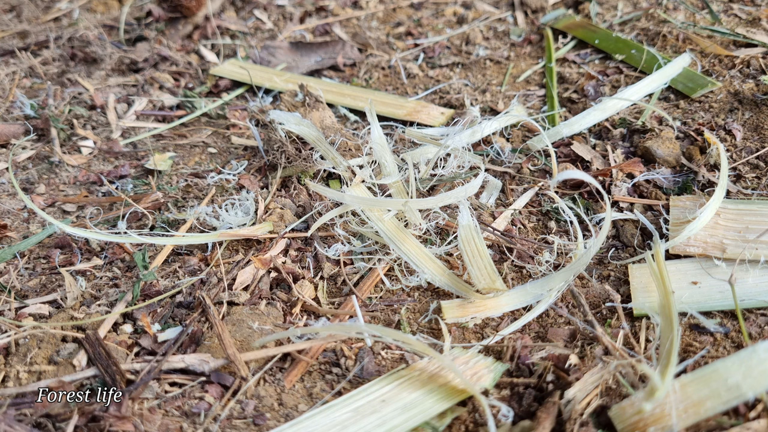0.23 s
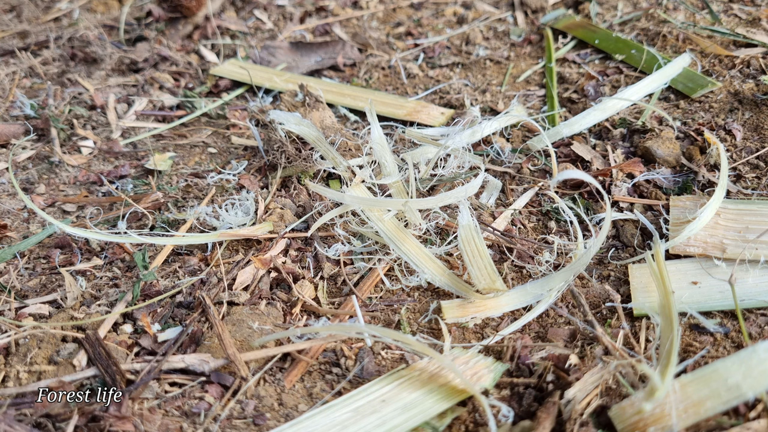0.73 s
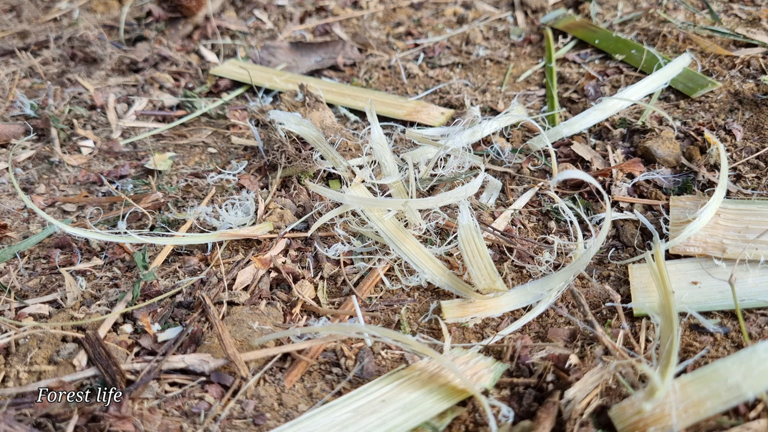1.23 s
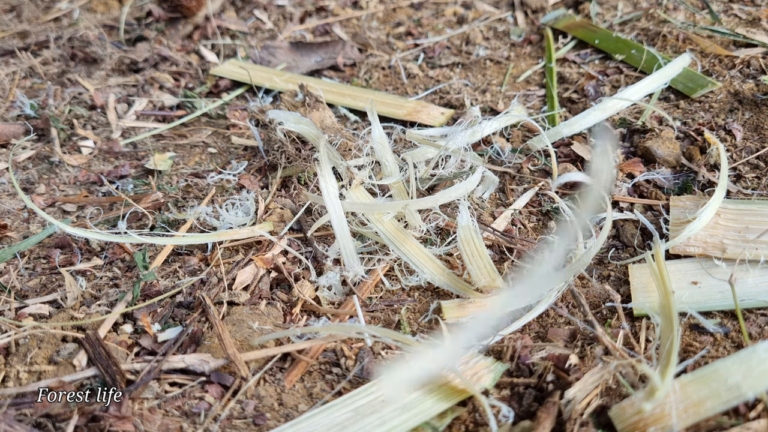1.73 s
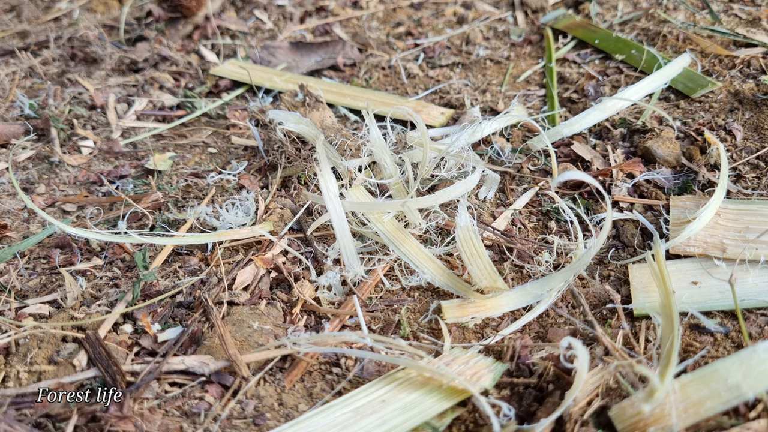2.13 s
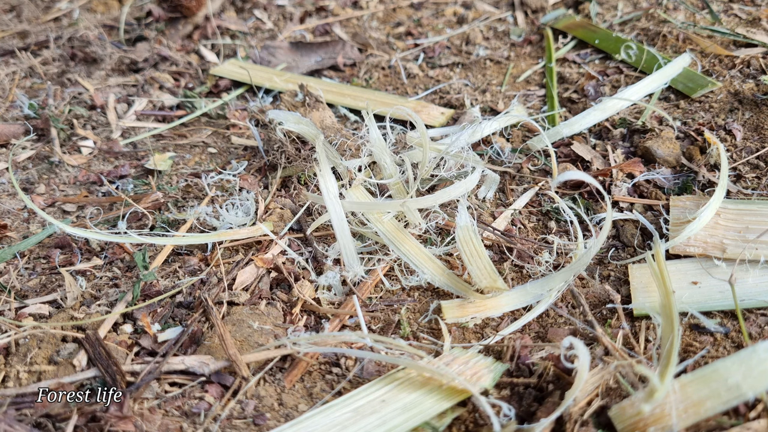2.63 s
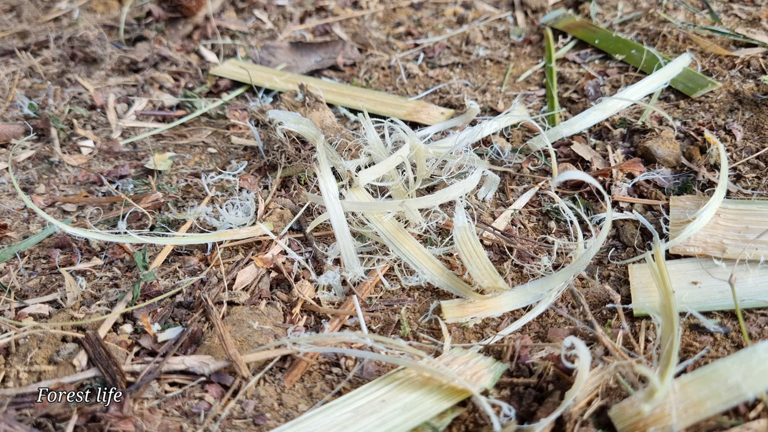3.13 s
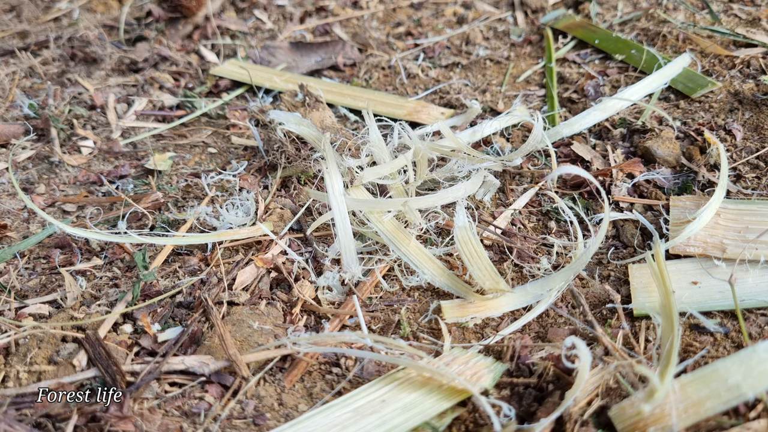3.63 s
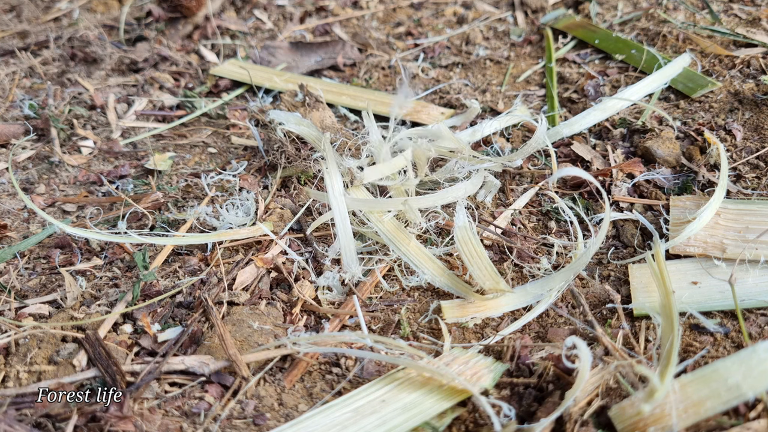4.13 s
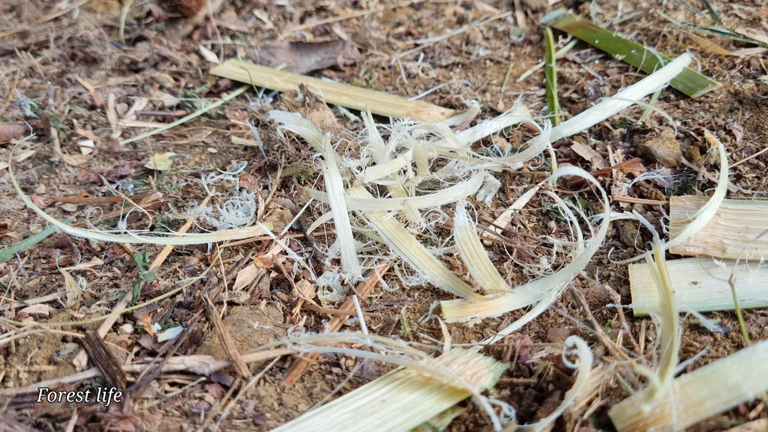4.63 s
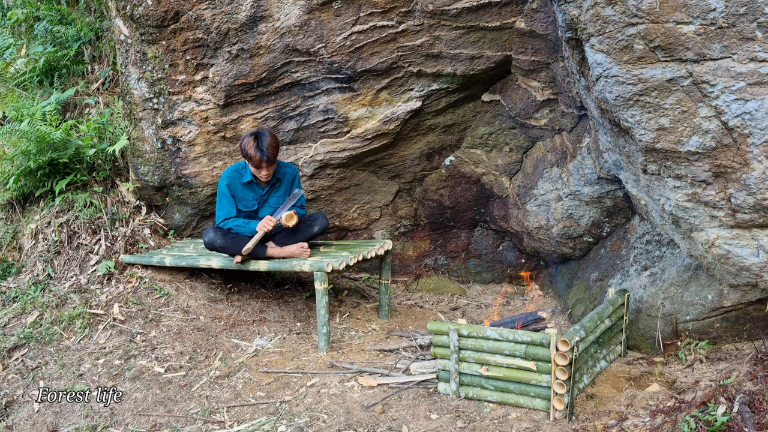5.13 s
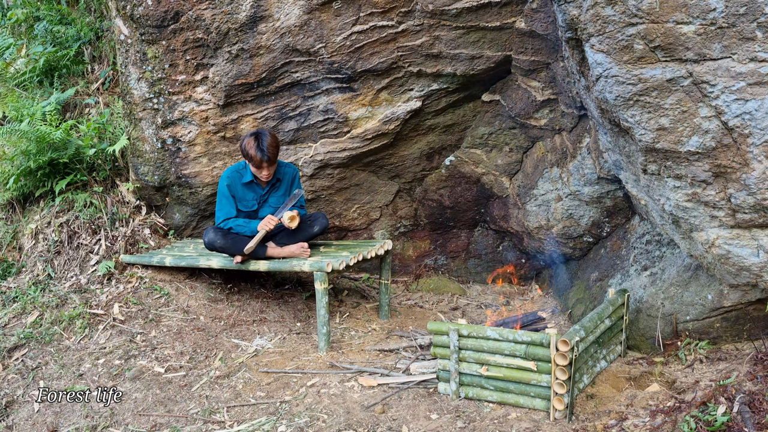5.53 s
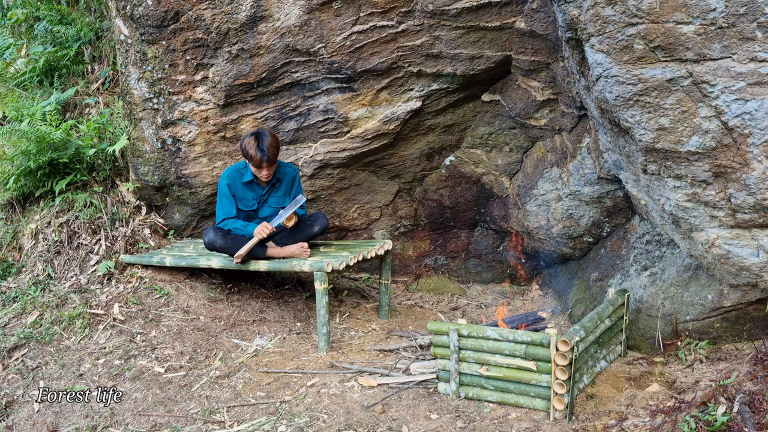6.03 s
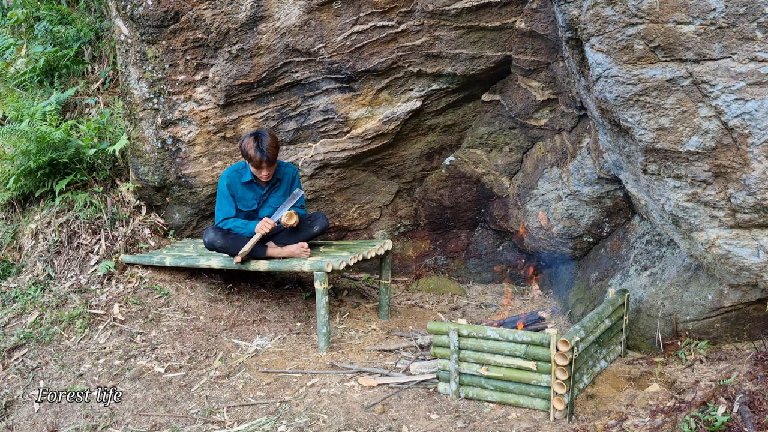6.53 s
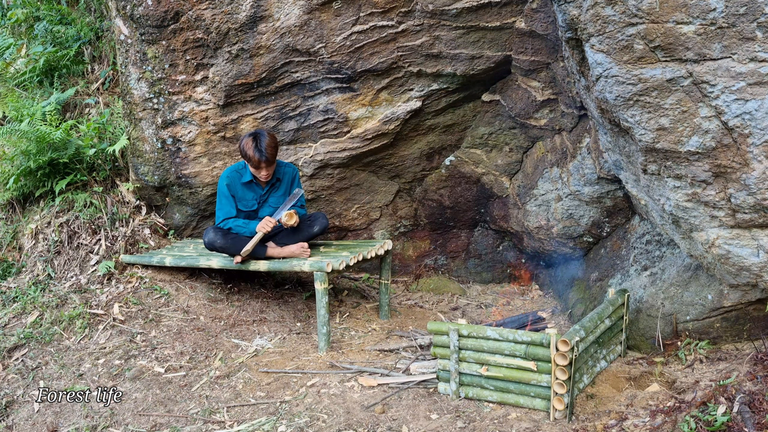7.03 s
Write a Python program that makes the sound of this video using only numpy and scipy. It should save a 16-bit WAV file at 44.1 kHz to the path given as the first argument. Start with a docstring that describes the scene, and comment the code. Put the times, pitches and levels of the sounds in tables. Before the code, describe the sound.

Dry, close stereo pickup of bamboo being cut by hand in the open. The blade lands lightly, rasps along the wood and bites with a hollow knock and splintering snap, then draws back with a faint slide. Strokes repeat slightly unevenly, with short dull reflections from ground and rock. Just past five seconds the final crack gives way to quiet, wider forest air and fluttering insects until the end.

```python
"""Outdoors, close by: a machete shaves strips off a bamboo tube. Stroke: the edge scrapes (filtered random
ticks), then bites; decaying tube modes give the hollow knock, bursts of breaking fibres the crack. Lighter
touches, brushes of the settling shaving and drawn-back slides fall between. Around the last stroke the near air
fades into the wider forest: a soft far rush (coloured noise) and thin insects (a narrow, fluttering noise
band)."""
import sys
import numpy as np
from scipy import signal
from scipy.fft import rfft, irfft, next_fast_len
from scipy.io import wavfile
from scipy.ndimage import uniform_filter1d

SR = 44100
rng = np.random.default_rng(int(sys.argv[2]) if len(sys.argv) > 2 else 0)


def digitize_waveform(pressure):
    """Quantize a signal to 16-bit integers and store it at the path in sys.argv[1].

    Rows of a 2-D input are taken as channels; values are limited to [-1, 1].
    """
    field = np.atleast_2d(pressure).T
    bounded = np.clip(field, -1, 1)
    quanta = np.round(bounded * 32767).astype(np.int16)
    wavfile.write(sys.argv[1], SR, quanta)


N = 321475
TIME_S = np.arange(N) / SR
RING_S = np.arange(round(.25 * SR)) / SR

# Cutting strokes, levels relative; favoured_hz: tube mode the blow favours; strip_hz: lifted strip;
# grip_t60_s: extra damping
# [start_s, thud_db, knock_db, clack_db, crack_db, favoured_hz, strip_hz, grip_t60_s]
STROKES = [(.806, -15, -13.5, -23.5, -51, 520, 2900, 0.94),
           (1.567, -11.5, -13, -20, -40.5, 760, 2170, 0.79),
           (2.3023, -12.5, -14, -21.5, -41.5, 820, 1630, 0.97),
           (3.0828, -17.5, -22, -27, -47.5, 526, 1150, 1.1),
           (3.7779, -13.5, -19.5, -20.5, -44, 580, 1360, 0.81),
           (4.594, -15, -15, -19, -41, 685, 3040, 0.78), (5.026, -14.3, -14.5, -22, -42.5, 590, 1280, 0.51)]
# Light touches of blade and tube, levels relative [start_s, knock_db, clack_db, favoured_hz, grip_t60_s]
TAPS = [(.418, -30.5, -32, 860, 0.33), (.461, -32.5, -40.5, 834, 0.4), (1.507, -40, -36, 674, 0.45),
        (1.759, -44, -54.5, 665, 1), (2.27, -30, -34.5, 860, .5), (2.516, -47.5, -51, 680, 1),
        (3.019, -41.5, -37, 700, .5), (3.75, -41, -38, 660, 0.69), (3.832, -34, -35.5, 610, 0.058),
        (3.971, -40, -49, 660, .5), (4.545, -37, -41, 647, 0.56), (4.657, -31.5, -55, 585, 0.12),
        (5.084, -32.5, -38.5, 620, 0.23)]
# Bending and air modes of the held tube, nominal [pitch_hz, relative_db, t60_s, left_minus_right_db]
TUBE_MODES = [(100, -23.5, 0.22, 1), (166, -21, 0.13, 1), (216, -24, 0.14, 3), (261, -9.5, 0.026, -0.5),
              (341, -3, 0.065, 5), (383, -6.5, 0.056, 6.5), (407, -12, 0.068, -8.5),
              (492, -11, 0.028, -5.5), (542, -9.5, 0.052, -0.5), (633, -11.5, 0.058, 4),
              (674.5, -14, 0.12, -2), (791, -19, 0.12, -6), (881.7, -17.5, 0.13, 3)]
# Tube wall modes, nominal [pitch_hz, relative_db, t60_s, left_minus_right_db]
WALL_MODES = [(1005, -8.5, 0.087, 7), (1137, 1.5, 0.025, -1.5), (1255, 2.5, 0.07, 4.5),
              (1293, -1.5, 0.04, 16.5), (1430, -1.5, 0.032, 9), (1515, -12, 0.02, 2.5),
              (1635, 0, 0.053, 9.5), (1736, 6.5, 0.063, 2.5), (1951, -3.5, 0.072, 15.5),
              (2125, -6.5, 0.089, -10), (2270, -6, 0.081, 0), (2404, -11.5, 0.1, -3),
              (2620, -12, 0.056, 13), (2894, -20.5, 0.086, -17), (3025, -4.5, 0.034, 11),
              (3590, -10, 0.057, -3)]
# Spectrum of the splitting fibres' splinters [frequency_hz, relative_db]
SPLINTER_SPECTRUM = [(250, -19), (480, 9.5), (680, 14.5), (1000, -1.5), (1350, 8.5), (1900, -1),
                     (2550, -1.5), (3050, -2.5), (3400, -10), (4200, -9), (5500, -12.5), (8000, -59)]
# Spectrum of the fibre crack in the air [frequency_hz, relative_db]
CRACK_SPECTRUM = [(800, 2), (2000, -10), (3600, -19), (5200, 4.5), (6200, 0.5), (7200, 7.5), (8000, -4.5),
                  (9200, 4), (11000, -10.5), (15500, -7)]
# Edge pushed along the wood up to the bite [start_s, length_s, pressure_db, hiss_db]
PUSHES = [(0.691, 0.12, -39.5, -42), (1.476, 0.11, -36.5, -36.5), (2.218, 0.098, -39.5, -42),
          (2.982, 0.091, -41, -40), (3.692, 0.11, -42.5, -43.5), (4.496, 0.11, -41, -43.5),
          (4.95, 0.078, -42, -45)]
# Blade drawn back up the tube between strokes [middle_s, length_s, pressure_db, hiss_db]
DRAWS = [(0.146, 0.082, -42, -46), (1.192, 0.085, -41.5, -40), (1.961, 0.13, -41.5, -40),
         (2.705, 0.11, -42, -43.5), (3.418, 0.12, -43, -44.5), (4.188, 0.17, -46, -46)]
# The cut shaving settles against the wood: quick slides that fade [start_s, length_s, pressure_db, hiss_db]
BRUSHES = [(0.413, 0.11, -38, -38.5), (0.543, 0.2, -52.5, -47.5), (0.945, 0.15, -52, -45),
           (1.03, 0.055, -49, -51), (1.386, .055, -46.5, -46), (1.756, 0.16, -49.5, -46),
           (2.113, 0.069, -50, -49), (3.197, .12, -49, -44)]
# Resonances of blade and tube under a sliding edge, nominal [pitch_hz, width_hz, relative_db]
BLADE_MODES = [(332, 22, 7.5), (670, 61, 10.5), (834, 96, 2), (1306, 260, 1), (1510, 140, -7),
               (1980, 90, 4), (2890, 980, -4), (3420, 82, 2.5), (4000, 760, -8.5), (5100, 900, -37)]
# Spectrum of the sliding edge's hiss [frequency_hz, relative_db]
EDGE_HISS = [(2500, -12), (4500, 6.5), (6200, 2.5), (7400, 7.5), (8000, 5.5), (10000, 8.5), (11500, 2),
             (15500, -3.5)]
# Lag of the work on the right side [frequency_hz, lag_s]
RIGHT_LAG = [(100, 0.00039), (350, 0.00059), (600, 0.00057), (1000, 0.0004), (1500, 0.0003366)]
# Tone of the scatter from ground and rock face [frequency_hz, relative_db]
SCATTER_TONE = [(100, -3), (340, -2.5), (600, 5.5), (1400, -5.0), (3000, -6.5), (8000, -9)]
# Side balance of work and near air [frequency_hz, left_minus_right_db]
NEAR_PAN = [(200, 0.6), (6000, -0.5), (8000, 0.5), (10000, -2), (13000, -5), (15500, 1)]
# Noise density of the near air [frequency_hz, density_db_per_hz]
NEAR_AIR = [(20, -81), (45, -62.5), (80, -64), (130, -74.5), (230, -72.5), (330, -79), (450, -84),
            (700, -82), (1100, -88.5), (2300, -91), (3300, -89.5), (5700, -93), (9500, -87), (15500, -89)]
# Noise density of the forest [frequency_hz, density_db_per_hz]
FOREST = [(20, -98), (45, -76), (80, -69), (130, -83.5), (210, -88), (330, -84), (500, -80), (800, -78.5),
          (1400, -83), (2300, -87.5), (6000, -94.5), (9000, -92.5), (11000, -97), (15500, -96.5)]
# Likeness of the two sides of the air noise [frequency_hz, correlation -1..1]
SAME = [(60, 0.93), (130, 1), (290, 0.83), (640, -0.17), (1410, -0.52), (3100, -0.19), (6800, -0.042),
        (15000, -0.1)]

TAP_THUD_DB = -3  # re knock: a touch hardly bends the tube
TAP_CRACK_DB, TAP_SPOT_HZ = -64, 2040  # few fibres broken (relative); resonance of the spot
PUSH_RISE_S, PUSH_STALL_S = 0.032, 0.015  # blade gathers speed, then stalls as it digs in
PUSH_BUILD_DB = 7.5  # pressure growth along a push
DRAW_LAG_S = .008  # hand bears down after the blade's fastest moment
BRUSH_RISE_S = 0.012  # takes hold quickly, then slows evenly
EDGE_RING_HZ = 9060
INSECT_HZ, INSECT_HALF_WIDTH_HZ, INSECT_DENSITY_DB_PER_HZ = 8090, 320, -83.5
WIDEN_START_S, WIDEN_END_S = 5.06, 5.2  # near air fades into the forest
CUTOFF_HZ = 15650


def blows():
    """Every bite and light touch of the blade: impulsive excitation of the tube."""
    out = np.zeros((2, N))
    for row in STROKES:
        bite = blow(row, body_db=13.5, favour_db=5.5, wall_db=-9.5, splinter_db=-10.5,
                    split_s=0.0025, crack_t60_s=0.013, push_hz=2570)
        add(out, row[0], bite)
    for start_s, knock_db, clack_db, favoured_hz, grip_t60_s in TAPS:
        row = (start_s, knock_db + TAP_THUD_DB, knock_db, clack_db, TAP_CRACK_DB,
               favoured_hz, TAP_SPOT_HZ, grip_t60_s)
        touch = blow(row, body_db=9, favour_db=14.5, wall_db=-17, splinter_db=-16,
                     split_s=0.0039, crack_t60_s=0.078, push_hz=2200)
        add(out, start_s, touch)
    return out


def blow(row, body_db, favour_db, wall_db, splinter_db, split_s, crack_t60_s, push_hz):
    """The blade's push rings the tube; a burst of splitting fibres rings its wall and cracks in the air."""
    _, thud_db, knock_db, clack_db, crack_db, favoured_hz, strip_hz, grip_t60_s = row

    # low modes take the thud level, upper ones the knock level
    mode_hz = np.transpose(TUBE_MODES)[0][:, None]
    upper = np.clip((mode_hz - 420) / 130, 0, 1)
    # the place of the blow decides which mode answers best
    place_db = favour_db * abs(resonance(mode_hz, favoured_hz, 77)) ** 2
    weight_db = thud_db + upper * (knock_db - thud_db) + place_db
    body = ring(TUBE_MODES, weight_db, .4 + 1.5 * upper)
    body = signal.sosfilt(signal.butter(2, push_hz, fs=SR, output="sos"), body)

    def strip(f):
        """Resonance of the strip being lifted, added to a flat response."""
        return 1 + amp(-1.5) * abs(resonance(f, strip_hz, 280)) ** 2

    fibres = snaps(len(RING_S), 9000, 0.58) * np.exp(-RING_S / split_s)
    wall = unit(colour(convolve(fibres, ring(WALL_MODES, 0, 0.92)), strip))

    # the split runs on in ever smaller snaps
    split = np.array([snaps(len(RING_S), 8000, 1.85) for side in range(2)])
    splinters = colour(split * dying(0.084), lambda f: amp(read(SPLINTER_SPECTRUM, f)) * strip(f))
    crack_decay = dying(crack_t60_s) + amp(-16.0) * dying(0.057)
    crack = unit(colour(split * crack_decay, lambda f: amp(read(CRACK_SPECTRUM, f))))
    clack = amp(wall_db) * wall + amp(splinter_db) * unit(splinters)

    # hand and buried blade soak up the ringing
    return dying(grip_t60_s) * (amp(body_db) * body + amp(clack_db) * clack + amp(crack_db) * crack)


def ring(modes, weight_db, vary_db):
    """Decaying modes on both sides, signs alternating; the grip shifts each one's level, pitch and pan."""
    hz, db, t60_s, pan_db = np.transpose(modes)[:, :, None]
    size_db, tune, turn_db = rng.standard_normal((3, len(modes), 1)) * vary_db
    sign = -(-1) ** np.arange(len(modes))[:, None]
    decay = amp(db + size_db + weight_db - 60 * RING_S / t60_s)
    waves = sign * decay * np.cos(2 * np.pi * hz * (1 + tune / 200) * RING_S)
    return np.array([(amp(side * (pan_db + turn_db) / 2) * waves).sum(0) for side in (1, -1)])


def snaps(n, per_s, spread_db):
    """Fibres breaking at random moments, a few of them large."""
    size = amp(spread_db * np.minimum(rng.exponential(1, n), 4))
    return size * rng.choice([-1, 1], n) * (rng.random(n) < per_s / SR)


def slides():
    """The edge catches on fine fibres: their ticks ring blade and tube, and hiss."""
    pressure, hiss = hand()
    chatter = amp(1.5 * unit(uniform_filter1d(rng.standard_normal(N), size=260)))
    shared = snaps(N, 2200, 1.66)
    ticks = chatter * np.array([shared + 0.76 * snaps(N, 3500, 2.3) for side in range(2)])

    def blade(f):
        """Sum of the blade and tube resonances, skirts steepened."""
        return sum(amp(db) * resonance(f, hz, width_hz) * abs(resonance(f, hz, 4 * width_hz))
                   for hz, width_hz, db in BLADE_MODES)

    def thin_edge(f):
        """Hiss of the edge plus the faint singing of its thin steel."""
        return np.hypot(amp(read(EDGE_HISS, f)), amp(11.5) * abs(resonance(f, EDGE_RING_HZ, 98)))

    scrape = unit(colour(ticks, blade))
    edge = unit(colour(ticks, thin_edge))
    return pressure * scrape + hiss * edge


def hand():
    """Gains of edge pressure and hiss, following the speed of every push, draw and settling shaving."""
    out = np.zeros((2, N))
    for start_s, length_s, pressure_db, hiss_db in PUSHES:
        rise = (TIME_S - start_s) / PUSH_RISE_S
        stall = (start_s + length_s - TIME_S) / PUSH_STALL_S
        speed = np.clip(np.minimum(rise, stall), 0, 1)
        still_to_go = np.clip(1 - (TIME_S - start_s) / length_s, 0, 1)
        out += [speed * amp(pressure_db - PUSH_BUILD_DB * still_to_go), speed * amp(hiss_db)]
    for middle_s, length_s, pressure_db, hiss_db in DRAWS:
        bearing = arch(middle_s + DRAW_LAG_S, length_s)
        out += [bearing * amp(pressure_db), arch(middle_s, length_s) * amp(hiss_db)]
    for start_s, length_s, pressure_db, hiss_db in BRUSHES:
        after_s = TIME_S - start_s
        speed = np.clip(np.minimum(after_s / BRUSH_RISE_S, 1 - after_s / length_s), 0, 1)
        out += [speed * amp(pressure_db), speed * amp(hiss_db)]
    return out


def arch(middle_s, length_s):
    """Squared-cosine rise and fall around a middle time."""
    return np.cos(np.pi * np.clip((TIME_S - middle_s) / length_s, -.5, .5)) ** 2


def surroundings(x, early_db, early_s, early_t60_s, late_db, late_t60_s):
    """The right side hears the work later; ground and rock face throw back a short, dull scatter."""
    right = colour(x[1], lambda f: np.exp(-2j * np.pi * f * read(RIGHT_LAG, f)))
    x = np.array([x[0], right])
    shape = (2, len(RING_S))
    taps = rng.choice([-1., 1.], shape) * (rng.random(shape) < 3000 / SR)
    early = unit(taps * (RING_S > early_s) * dying(early_t60_s))
    late = unit(taps[::-1] * (RING_S > .03) * dying(late_t60_s))  # sides swapped
    scatter = (amp(early_db) * early + amp(late_db) * late) / np.sqrt(len(RING_S))
    return x + colour(convolve(x, scatter), lambda f: amp(read(SCATTER_TONE, f)))


def near_air():
    """Close air: coloured noise with a slight level waver."""
    return air(lambda f: read(NEAR_AIR, f), waver_db=1.0, waver_hz=14)


def forest():
    """Soft far rush: coloured noise with a slight level waver."""
    return air(lambda f: read(FOREST, f), waver_db=0.56, waver_hz=25)


def insects():
    """Thin trill: a narrow noise band whose level flutters at random."""
    def density_db(f):
        offset = np.minimum(abs(f - INSECT_HZ) / INSECT_HALF_WIDTH_HZ, 4)
        return INSECT_DENSITY_DB_PER_HZ - 6 * offset ** 3
    return air(density_db, waver_db=1.5, waver_hz=60)


def air(density_db, waver_db, waver_hz):
    """Noise of a given density per Hz, sides alike in the bass, level wavering by waver_db rms."""
    a, b = rng.standard_normal((2, N)) * np.sqrt(SR / 2)
    same = lambda f: np.clip(read(SAME, f), -1, 1)
    right = colour(a, same) + colour(b, lambda f: np.sqrt(1 - same(f) ** 2))
    waver = unit(colour(rng.standard_normal(N), lambda f: np.exp(-f / waver_hz)))
    return colour(np.array([a, right]), lambda f: amp(density_db(f))) * amp(waver_db * waver)


def amp(db):
    """Decibels to gain."""
    return 10 ** (np.asarray(db) / 20)


def unit(x):
    """Scales to rms 1."""
    return x / np.sqrt(np.mean(x ** 2) + 1e-20)


def dying(t60_s):
    """Exponential decay, 60 dB down after t60_s."""
    return np.exp(-np.log(1000) * RING_S / t60_s)


def read(points, hz):
    """Reads a table along a log-frequency axis."""
    f, value = np.transpose(points)
    return np.interp(np.log(hz + 1), np.log(f + 1), value)


def resonance(f, hz, width_hz):
    """Complex response of one resonance, gain 1 at its centre."""
    return 1 / (1 + 1j * (f ** 2 - hz ** 2) / (width_hz * f + 1e-9))


def colour(x, gain):
    """Filters by a gain given as a function of Hz."""
    n = x.shape[-1]
    size = next_fast_len(n + 2048)
    return irfft(rfft(x, size) * gain(np.fft.rfftfreq(size, 1 / SR)), size)[..., :n]


def convolve(x, response):
    """Convolves, keeping the length of x."""
    return signal.fftconvolve(np.atleast_2d(x), np.atleast_2d(response), axes=1)[:, :x.shape[-1]]


def add(mix, start_s, sound):
    """Mixes a stereo sound in at start_s."""
    part = mix[:, round(start_s * SR):][:, :sound.shape[1]]
    part += sound[:, :part.shape[1]]


def scene():
    """The work in its near air, then the forest with insects."""
    work = surroundings(blows() + slides(), early_db=-12.5, early_s=.009, early_t60_s=0.085,
                        late_db=-27.0, late_t60_s=0.12)
    wide = np.clip((TIME_S - WIDEN_START_S) / (WIDEN_END_S - WIDEN_START_S), 0, 1)
    near = work + np.sqrt(1 - wide) * near_air()
    near = colour(near, lambda f: amp(np.outer([1, -1], read(NEAR_PAN, f)) / 2))
    return near + np.sqrt(wide) * (forest() + insects())


def record(dry):
    """Rounds off the loudest peaks, then limits the band."""
    rounded = dry / (1 + dry ** 8) ** (1 / 8)
    lowpass = signal.firwin(511, CUTOFF_HZ, window=("kaiser", 9), fs=SR)
    return signal.oaconvolve(rounded, lowpass[None], "same")


dry = scene()
out = record(dry)
digitize_waveform(out)
```